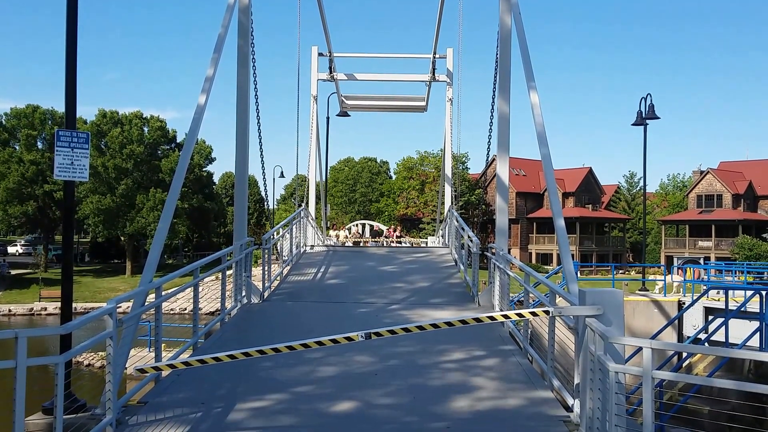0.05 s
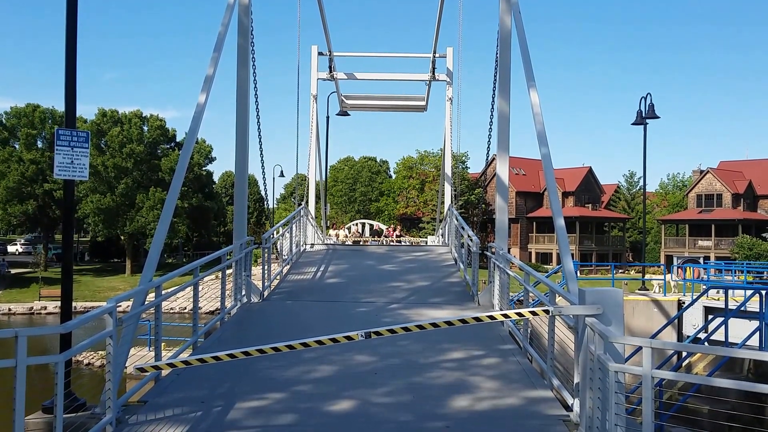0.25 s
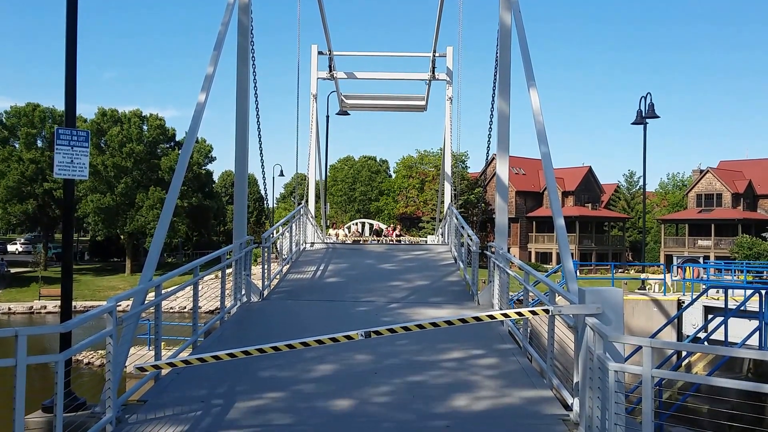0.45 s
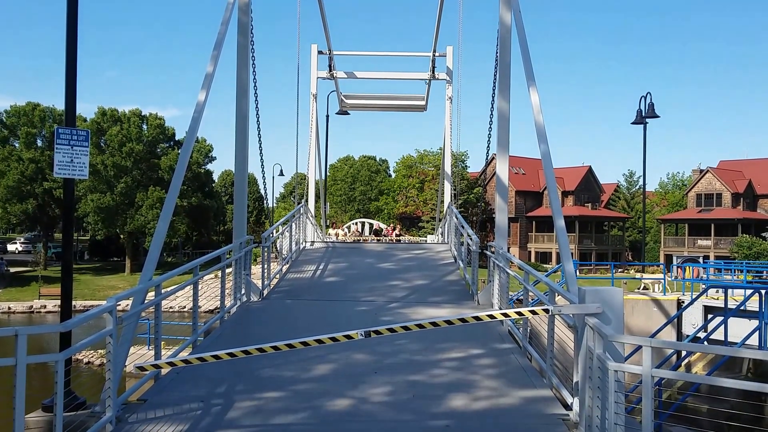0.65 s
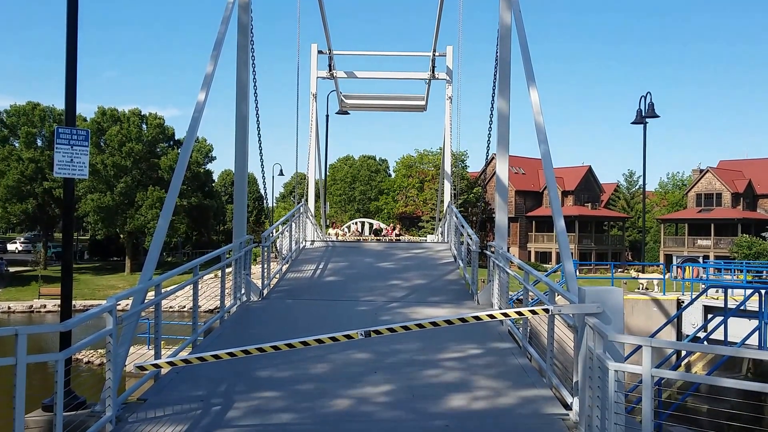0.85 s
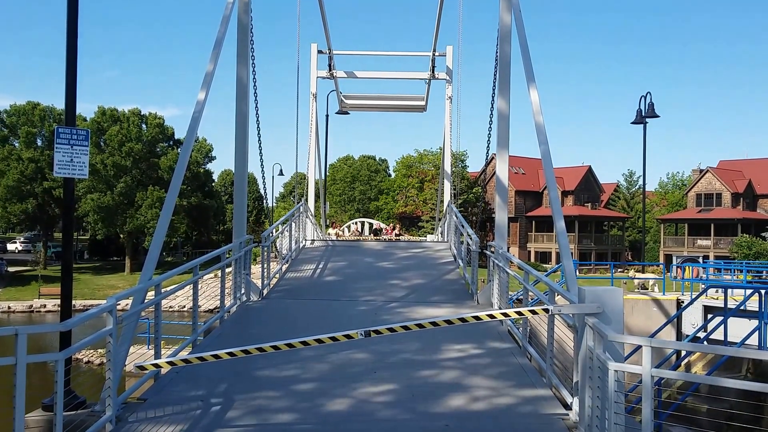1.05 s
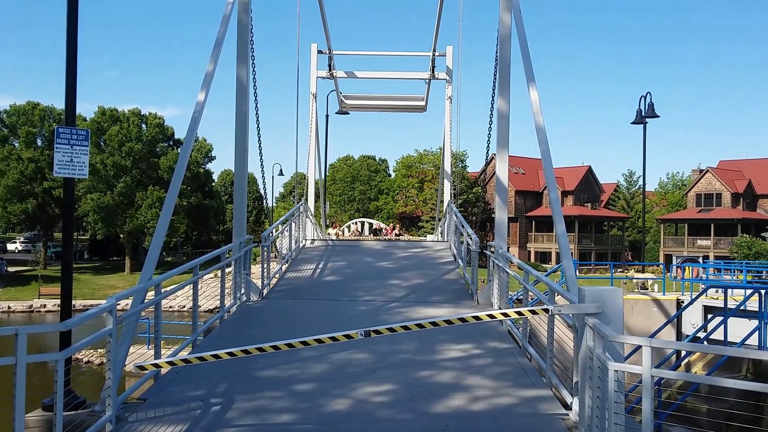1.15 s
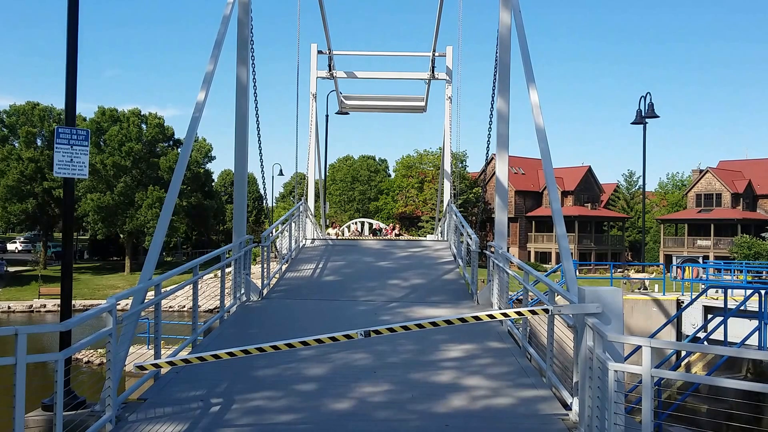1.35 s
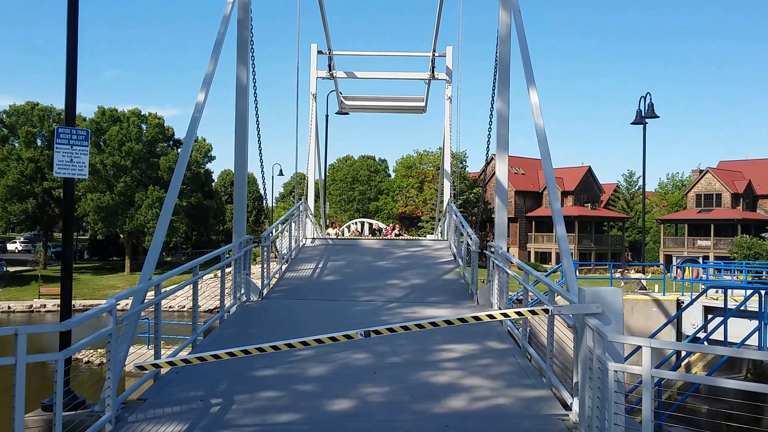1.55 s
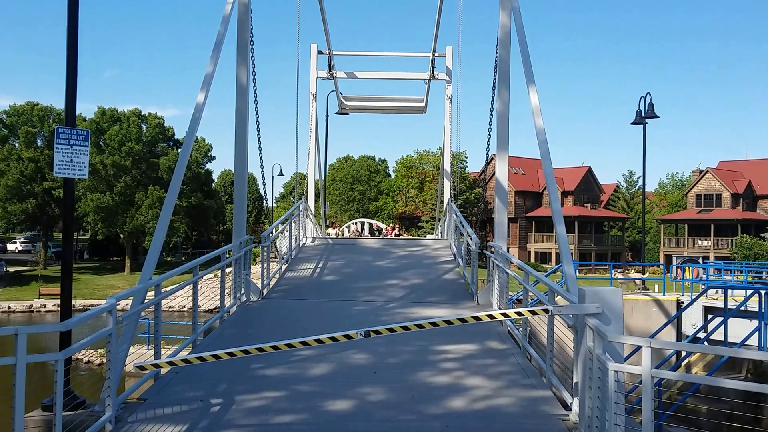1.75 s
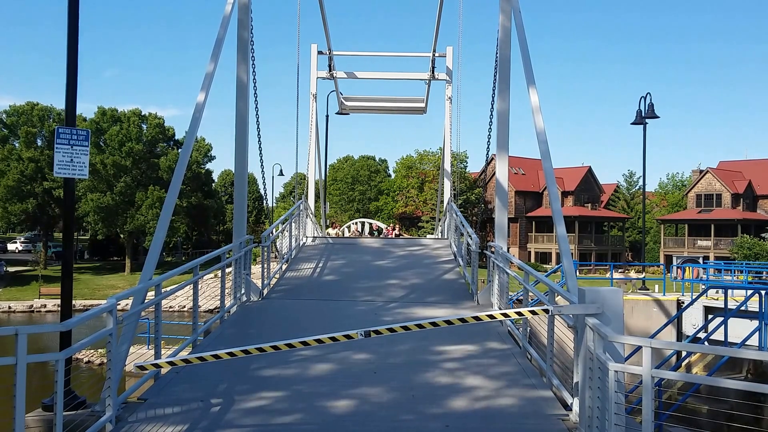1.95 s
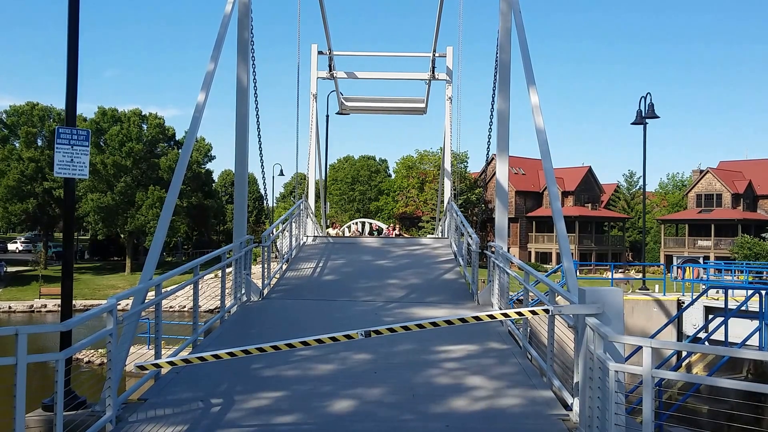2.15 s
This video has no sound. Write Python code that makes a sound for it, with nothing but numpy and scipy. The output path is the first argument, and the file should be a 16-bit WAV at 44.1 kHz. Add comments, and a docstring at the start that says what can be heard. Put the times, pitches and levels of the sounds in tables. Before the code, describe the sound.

A single ringing steel clank over gusty wind rumble and a distant engine hum.

```python
"""A steady wash of town and trees and a distant engine hum, at a steel footbridge over a river.
Wind eddies buffet the microphone in short low puffs. Then one metal clank: a blow with a quick
rattle rings the steelwork's modes and echoes off the banks, then off far houses and trees.
Wash, wind and echoes are shaped noise; the engine is wavering harmonics, the steel beating partials."""
import sys
import numpy as np
from scipy import signal
from scipy.fft import rfft, irfft
from scipy.io import wavfile

SR = 44100
rng = np.random.default_rng(int(sys.argv[2]) if len(sys.argv) > 2 else 0)


def dump(signal):
    """Clip the signal to [-1, 1] and save it as 16-bit WAV at the path in sys.argv[1]."""
    limited = np.clip(np.atleast_2d(signal).T, -1, 1)
    pcm = np.round(limited * 32767).astype(np.int16)
    wavfile.write(sys.argv[1], SR, pcm)


N = 97020

# town and trees: freq_hz, relative_db
WASH_SPECTRUM = [(20, -17.5), (40, -20.5), (60, -16.5), (110, -7.5), (190, -5), (270, -4), (330, -9.5),
                 (420, -12.5), (550, -16.5), (1150, -20), (2100, -26.5), (3400, -36), (4500, -36.5),
                 (6200, -35), (7500, -43.5), (9200, -50.5), (11000, -59.5), (15500, -59.5)]
WASH_DB = -34.5

# engine harmonics, fundamental first: rms_db
ENGINE_HARMONICS_DB = [-41, -42.5, -43, -56.5, -54]
ENGINE_HZ, ENGINE_WANDER_RATIO, ENGINE_FLUTTER_DB = 76.98, 0.0159, 2

# wind push on the microphone: time_s, level_db
BREEZE_CURVE = [(0, -37), (.21, -54), (.25, -23), (.33, -33), (.44, -36.5), (.53, -20), (.63, -27.5),
                (.72, -22.5), (.87, -27), (.96, -21), (1.11, -23.5), (1.23, -30), (1.35, -24), (1.45, -49),
                (1.56, -30), (1.63, -72), (1.95, -49), (2.1, -33)]
BREEZE_EDGE_HZ = 162
# wind puffs: peak_s, fall_s, level_db, edge_hz
BUFFETS = [(0.232, 0.006, -14, 170), (0.251, 0.01, -12, 214), (0.287, 0.018, -25, 160),
           (0.312, 0.017, -20.5, 165), (0.47, 0.012, -29, 150), (0.513, 0.0084, -22, 170),
           (0.541, 0.0097, -17, 210), (.66, 0.013, -20, 440), (0.668, 0.017, -12, 175),
           (0.692, 0.021, -12.5, 139), (0.714, 0.017, -11, 232), (0.748, 0.012, -13.5, 400),
           (.75, 0.0064, -29, 1190), (0.765, 0.012, -17, 197), (0.812, 0.017, -18.5, 268),
           (1.048, 0.022, -17, 240), (1.097, 0.019, -23, 161), (1.267, 0.016, -21, 140),
           (1.309, 0.02, -14, 206), (1.327, 0.011, -17, 267), (1.372, 0.015, -17, 154),
           (1.391, 0.01, -17.5, 213), (1.433, 0.011, -20, 193), (1.466, 0.013, -21.5, 232)]
BUFFET_RISE_RATIO = 0.5
WIND_LOW_HZ, WIND_LOW_ORDER, WIND_HIGH_ORDER = 67.8, 4.5, 4.2

# blow and rattle: start_s, gain_db
BLOWS = [(.554, -6), (.559, -1.5), (.573, -9), (0.61, -12)]
CONTACT_S = 0.0028
# dense higher modes at each blow: freq_hz, relative_db
CLASH_SPECTRUM = [(400, -26), (650, -12), (820, 1.5), (1100, 0.5), (1450, 3), (2200, -7.5), (3000, -10),
                  (3800, -24), (6300, -14), (8000, -25), (10500, -34), (15000, -54)]
CLASH_DB, CLASH_T60_S = -22, 0.08
# steelwork modes: pitch_hz, gain_db, t60_s
STEEL_MODES = [(772, -1, .48), (880, 0, .44), (953, -6, .42), (1081, -9, .6), (1151, -10, .55),
               (1181, -11, .6), (1368, -9, .36), (1411, -3, .33), (1596, -12, .55), (1624, -13, .95),
               (1776, -12, .5), (1857, -14, .5), (2110, -14, .52), (2322, -18, .42), (2773, -21, .6)]
STEEL_DB = -29.5
# thin lingering shimmer: freq_hz, relative_db
SHIMMER_SPECTRUM = [(9000, -35.5), (9900, -3), (10300, -1), (10700, -10), (11300, -34)]
SHIMMER_DB, SHIMMER_T60_S, SHIMMER_RISE_S = -67, 0.93, 0.015
# echo off the banks: freq_hz, relative_db
BANK_SPECTRUM = [(400, -7), (800, 1.5), (1300, -4.5), (2000, -5), (2800, -19), (3800, -25), (6200, -18.5),
                 (8500, -31.5), (12000, -48), (15000, -56)]
BANK_DB, BANK_T60_S, BANK_RISE_S = -25, 0.4, 0.025
# reverberation from far houses and trees: freq_hz, relative_db
FAR_SPECTRUM = [(400, -16), (800, 3), (1300, -7), (2000, -7.5), (3000, -22.5), (6200, -24.5), (8500, -36),
                (15000, -56)]
FAR_DB, FAR_T60_S, FAR_RISE_S = -36.5, 2.12, 0.076

LOW_CUT_HZ, HIGH_CUT_HZ = 47.6, 15830
TIME_S = np.arange(N) / SR
BINS_HZ = np.fft.rfftfreq(N, 1 / SR) + 1  # offset avoids log(0)


def amp(db):
    return 10 ** (np.asarray(db) / 20)


def unit_rms(x):
    return x / np.sqrt(np.mean(x ** 2) + 1e-20)


def add(mix, start_s, sound):
    part = mix[max(round(start_s * SR), 0):][:len(sound)]
    part += sound[:len(part)]


def noise(bin_gain):
    return unit_rms(irfft(rfft(rng.standard_normal(N)) * bin_gain, N))


def coloured(spectrum):
    freq_hz, relative_db = np.transpose(spectrum)
    return noise(amp(np.interp(np.log(BINS_HZ), np.log(freq_hz), relative_db)))


def drift(rate_hz):
    return noise(1 / (1 + (BINS_HZ / rate_hz) ** 4))


def wash():
    """Distant town and leaves: steady noise."""
    return amp(WASH_DB) * coloured(WASH_SPECTRUM)


def engine():
    """Far hum: harmonics share a wandering pitch, each wavers in level."""
    pitch_hz = ENGINE_HZ * (1 + ENGINE_WANDER_RATIO * drift(rate_hz=8.07))
    cycles = np.cumsum(pitch_hz) / SR
    out = np.zeros(N)
    for harmonic, rms_db in enumerate(ENGINE_HARMONICS_DB, 1):
        peak = np.sqrt(2) * amp(rms_db + ENGINE_FLUTTER_DB * drift(rate_hz=5.5))
        out += peak * np.sin(2 * np.pi * (harmonic * cycles + rng.random()))
    return out


def turbulence(edge_hz):
    """Low eddy noise, levelled to even strength."""
    low_loss = 1 + (WIND_LOW_HZ / BINS_HZ) ** (2 * WIND_LOW_ORDER)
    high_loss = 1 + (BINS_HZ / edge_hz) ** (2 * WIND_HIGH_ORDER)
    eddies = noise(1 / np.sqrt(low_loss * high_loss))
    local_power = signal.fftconvolve(eddies ** 2, np.hanning(SR // 30), "same")
    return unit_rms(eddies / np.sqrt(abs(local_power) + 1e-9))


def wind():
    """Eddies on the microphone: breeze rumble plus puffs that hit fast and ease off."""
    breeze_db = np.interp(TIME_S, *np.transpose(BREEZE_CURVE))
    out = amp(breeze_db) * turbulence(BREEZE_EDGE_HZ)
    for peak_s, fall_s, level_db, edge_hz in BUFFETS:
        width_s = fall_s * np.where(TIME_S < peak_s, BUFFET_RISE_RATIO, 1)
        puff = np.exp(-((TIME_S - peak_s) / width_s) ** 2)
        out += amp(level_db) * puff * turbulence(edge_hz)
    return out


def rise_decay(gain_db, t60_s, rise_s):
    return (1 - np.exp(-TIME_S / rise_s)) * amp(gain_db - 60 * TIME_S / t60_s)


def clash():
    """Each blow briefly excites dense higher modes."""
    out = np.zeros(N)
    for start_s, blow_db in BLOWS:
        envelope = rise_decay(CLASH_DB + blow_db, CLASH_T60_S, CONTACT_S)
        add(out, start_s, envelope * coloured(CLASH_SPECTRUM))
    return out


def steel_ring(scatter_gain=0.56, scatter_width_hz=23):
    """Blows feed energy to each mode; close neighbours and reflections make it beat."""
    out = np.zeros(N)
    for pitch_hz, mode_db, t60_s in STEEL_MODES:
        energy = np.zeros(N)
        for start_s, blow_db in BLOWS:
            add(energy, start_s, rise_decay(blow_db + mode_db, t60_s, CONTACT_S) ** 2)
        tone = np.sin(2 * np.pi * (pitch_hz * TIME_S + rng.random()))
        scatter = noise(1 / (1 + ((BINS_HZ - pitch_hz) / scatter_width_hz) ** 2))
        out += amp(STEEL_DB) * np.sqrt(energy) * (tone + scatter_gain * scatter)
    return out


def clank():
    """Struck steel; shimmer and diffuse near and far echoes build from the first blow."""
    out = clash() + steel_ring()
    shimmer = rise_decay(SHIMMER_DB, SHIMMER_T60_S, SHIMMER_RISE_S) * coloured(SHIMMER_SPECTRUM)
    bank_echo = rise_decay(BANK_DB, BANK_T60_S, BANK_RISE_S) * coloured(BANK_SPECTRUM)
    far_echo = rise_decay(FAR_DB, FAR_T60_S, FAR_RISE_S) * coloured(FAR_SPECTRUM)
    first_blow_s = BLOWS[0][0]
    add(out, first_blow_s, shimmer + bank_echo + far_echo)
    return out


def scene():
    return (wash() + engine() + wind() + clank())[None]


def record(dry):
    """Microphone low cut, then a steep treble limit."""
    low_cut = signal.butter(4, LOW_CUT_HZ, "highpass", fs=SR, output="sos")
    high_cut = signal.firwin(511, HIGH_CUT_HZ, window=("kaiser", 9), fs=SR)
    return signal.oaconvolve(signal.sosfilt(low_cut, dry), high_cut[None], "same")


dry = scene()
out = record(dry)
dump(out)
```